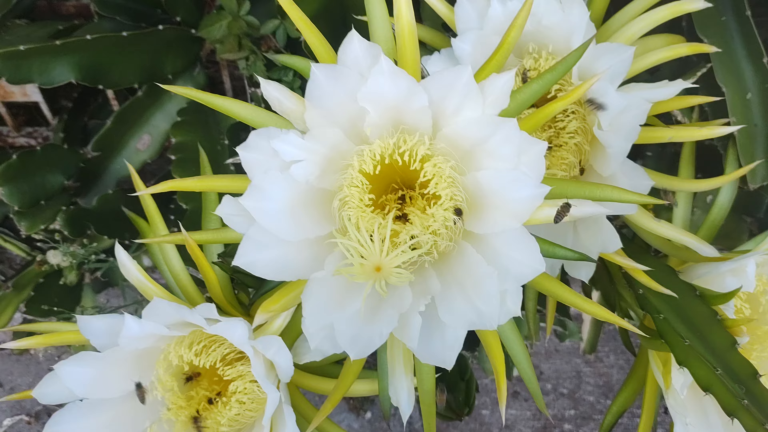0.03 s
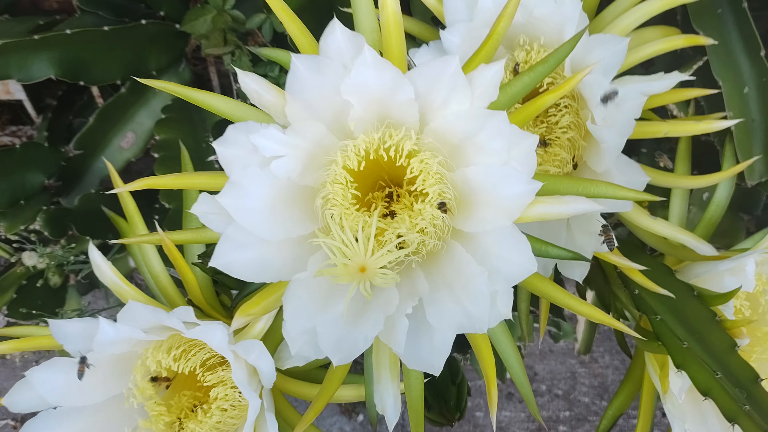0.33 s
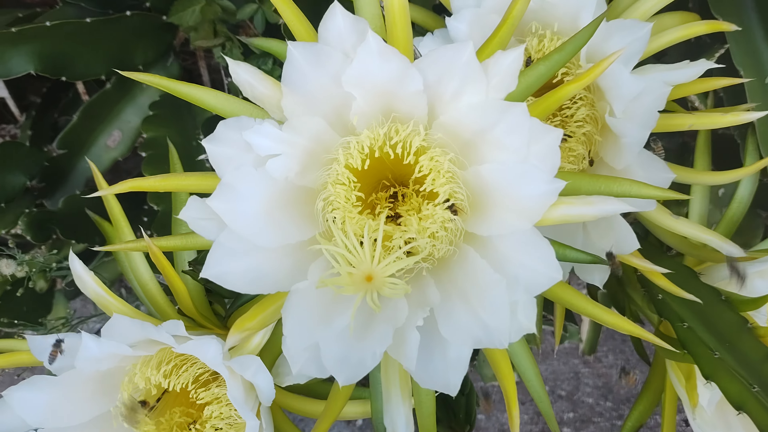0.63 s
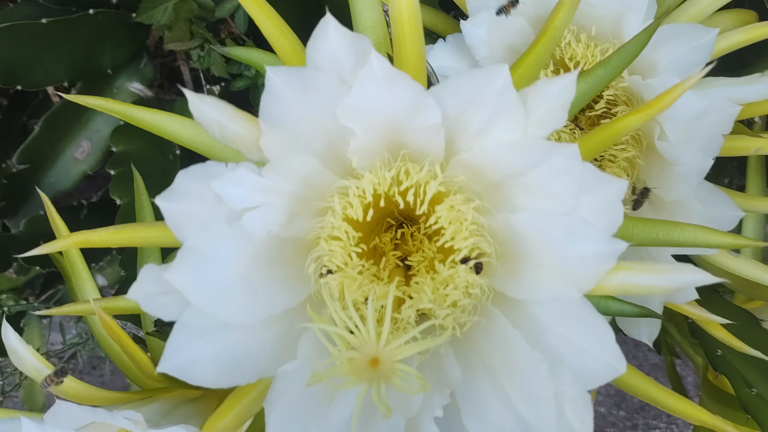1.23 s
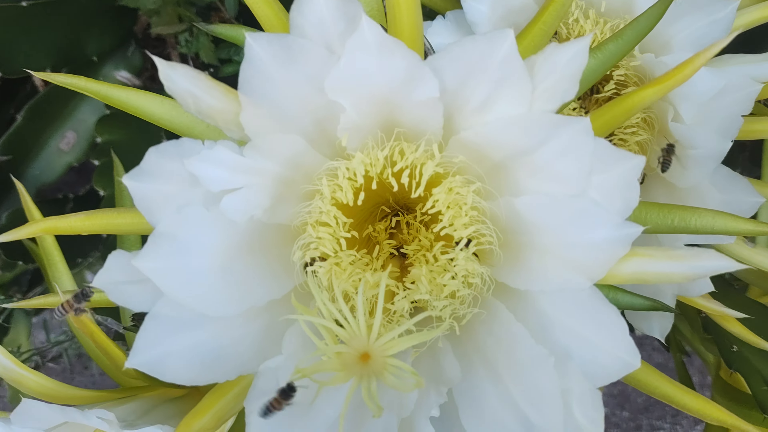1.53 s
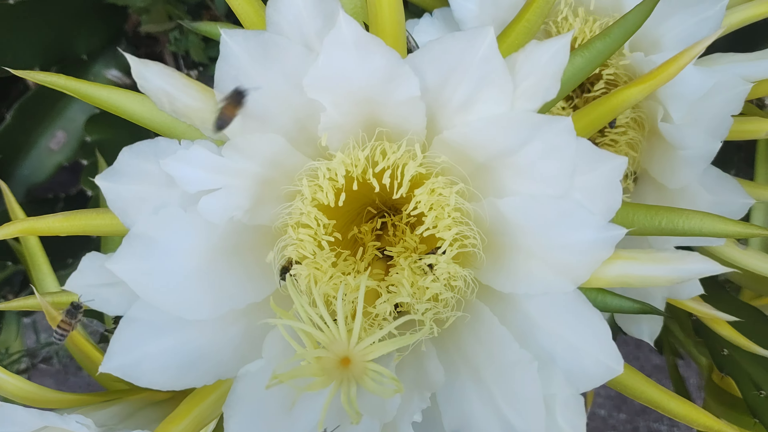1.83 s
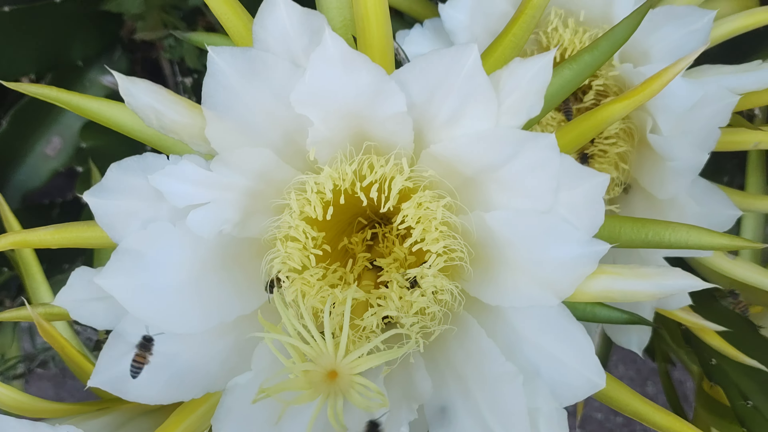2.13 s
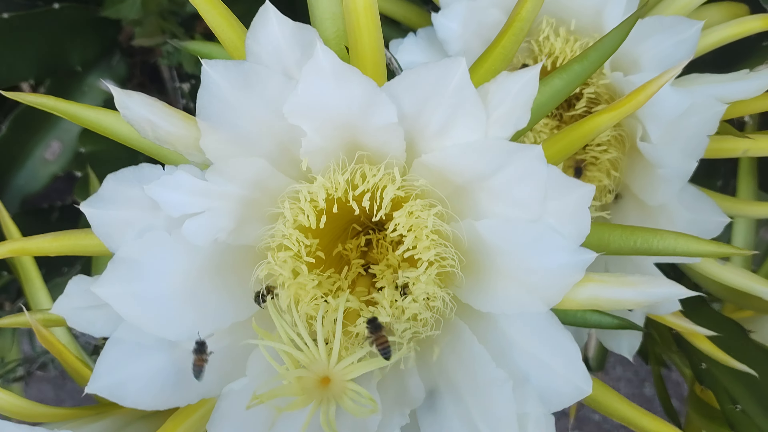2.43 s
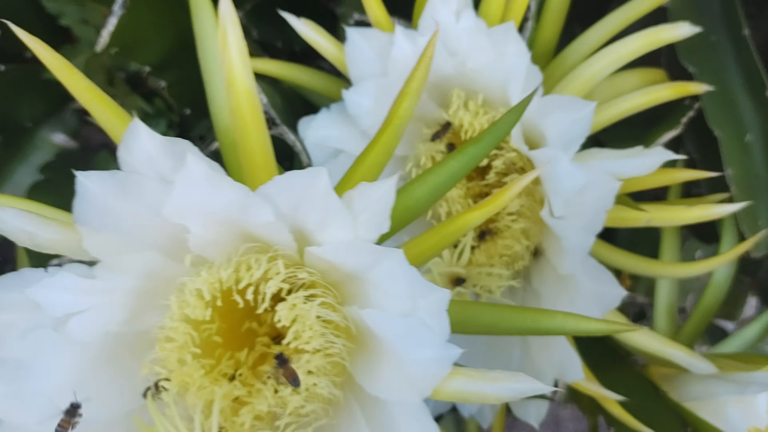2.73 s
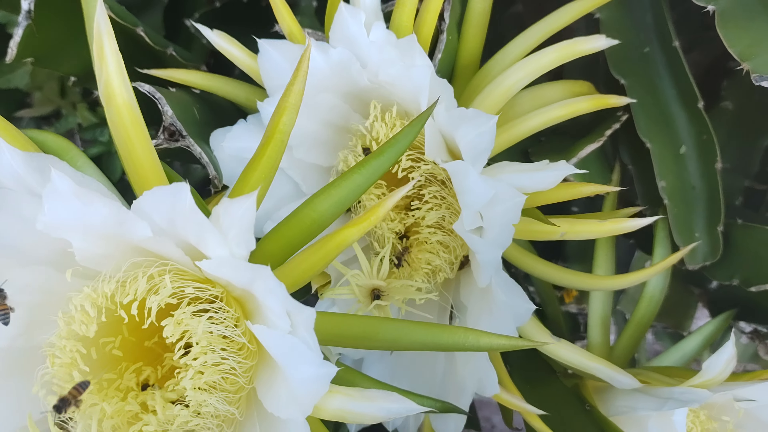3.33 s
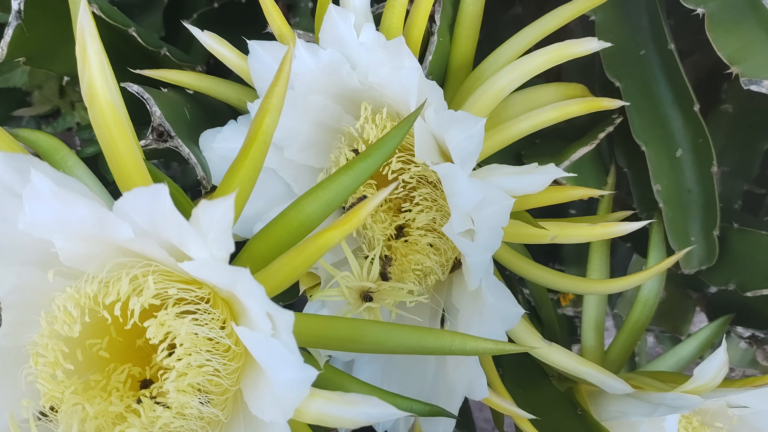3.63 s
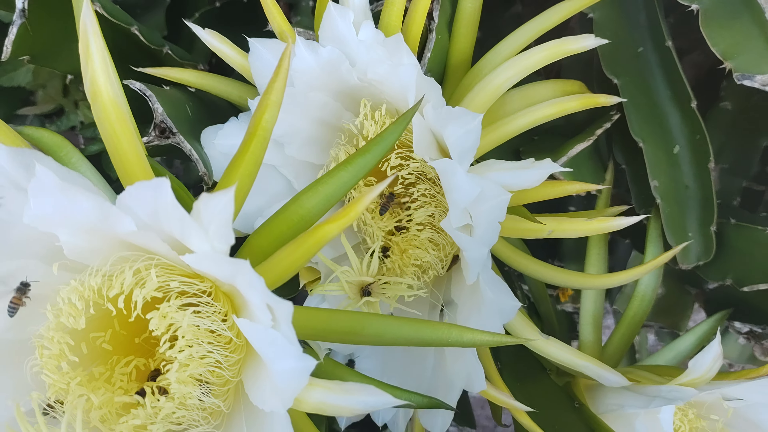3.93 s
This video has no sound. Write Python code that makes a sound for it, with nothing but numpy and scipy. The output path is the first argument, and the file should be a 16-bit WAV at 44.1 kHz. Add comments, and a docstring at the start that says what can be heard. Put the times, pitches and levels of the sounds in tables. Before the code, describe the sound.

Faint buzzing of bees in a garden, with far-off road noise behind them.

```python
"""Honeybees work large flowers in a garden, their beating wings making a faint hum.
A deeper-voiced insect passes, a far bird whistles once, and a few tiny chips and ticks sound.
Behind them is the rumble and hiss of far-off traffic. It sinks for a while, then a more hollow
road noise swells, perhaps a vehicle drawing nearer.
The microphone opens a moment late, after a small click."""
import sys
import numpy as np
from scipy import signal
from scipy.fft import rfft, irfft
from scipy.io import wavfile

SR = 44100
rng = np.random.default_rng(int(sys.argv[2]) if len(sys.argv) > 2 else 0)


def transcribe(signal):
    """Save signal, clipped to [-1, 1], as a 16-bit WAV file at the path in sys.argv[1]."""
    frames = np.atleast_2d(signal).T
    limited = np.clip(frames, -1, 1)
    pcm = np.round(limited * 32767).astype(np.int16)
    wavfile.write(sys.argv[1], SR, pcm)


N = 176400
T = np.arange(N) / SR


def from_db(db):
    """Turn decibels into a number to multiply a sound by."""
    return 10 ** (np.asarray(db) / 20)


def rms_one(x):
    """Scale a signal so that its average strength (rms) is 1."""
    return x / np.sqrt(np.mean(x ** 2) + 1e-20)


def level(rows):
    """A loudness curve that joins rows of t/s, level/dB."""
    return from_db(np.interp(T, *np.transpose(rows)))


def drift(rate):
    """A smooth random wobble of size about 1; rate is roughly its changes per second."""
    step, warm_up = 40, 2000   # one value every 40 samples; the first 2000 values are dropped
    memory = np.exp(-2 * np.pi * step * rate / SR)
    chance = rng.standard_normal(N // step + warm_up + 2)
    slow = signal.lfilter([1], [1, -2 * memory, memory * memory], chance)[warm_up:]
    return np.interp(np.arange(N) / step, np.arange(len(slow)), rms_one(slow))


def noise(colour, peaks=()):
    """Noise of strength 1; its colour says how strong the low and high pitches are, relatively."""
    hz = np.maximum(np.arange(N // 2 + 1) * SR / N, 1)
    points_hz, points_db = np.transpose(colour)
    db = np.interp(np.log(hz), np.log(points_hz), points_db)
    for centre, width, lift in peaks:
        db = db + lift / (1 + (2 * (hz - centre) / width) ** 2)
    return rms_one(irfft(rfft(rng.standard_normal(N)) * from_db(db), N))


def swell(middle, length):
    """A bell-shaped rise and fall, loudest at the middle time."""
    return np.exp(-2 * ((T - middle) / length) ** 2)


def slide(middle, length, hz, glide):
    """A pitch that slides through hz at the middle time, by glide Hz each second."""
    return hz + glide * np.clip(T - middle, -length, length)


# How loud the low rumble, the broad wash and the hollow road noise are: t/s, level/dB
RUMBLE_LEVEL = [(.38, -48.5), (.52, -43.5), (.85, -43.5), (1.3, -45.5), (1.95, -44), (2.4, -50),
                (2.8, -55.5), (3.35, -56), (3.7, -55), (4, -47)]
WASH_LEVEL = [(.38, -51.5), (.53, -47.5), (.9, -46.5), (1.65, -45.5), (2.25, -44), (2.6, -48.5), (3.0, -55),
              (3.35, -54), (4, -62)]
ROAD_LEVEL = [(.38, -70), (2.2, -59.5), (2.7, -54.5), (3.15, -52.5), (3.32, -54), (3.5, -47), (3.8, -43.5),
              (4, -41.5)]
# The colour of each: f/Hz, level/dB
RUMBLE_COLOUR = [(20, -31.5), (36, -26), (60, -5.5), (82, 1.5), (120, -3), (165, -6.5), (240, -9),
                 (350, -11), (480, -14), (680, -19.5), (1200, -51.5)]
WASH_COLOUR = [(200, -4.5), (650, -8), (790, -1.5), (890, -6.5), (1000, -3), (1230, -3.5), (1620, -0.5),
               (1950, -5), (2300, -8.5), (2650, -14), (3050, -30), (3450, -39.5), (4200, -51)]
ROAD_COLOUR = [(30, -21.5), (70, -9.5), (130, 4), (195, -3), (290, 0.5), (380, -1), (470, -6), (700, -3.5),
               (900, 2), (1300, -3.5), (1700, 1), (2100, 0), (2400, -5), (2700, -16), (3150, -25.5),
               (4000, -45.5)]
# Ringing pitches that make the road noise hollow: f/Hz, width/Hz, lift/dB
ROAD_PEAKS = [(288, 61, 7.4), (1001, 86, 7), (1905, 200, 5.1)]

def traffic():
    """Far traffic rumbles and hisses, then hollow road noise swells; each is a little unsteady."""
    rumble = level(RUMBLE_LEVEL) * noise(RUMBLE_COLOUR) * from_db(drift(12))
    wash = level(WASH_LEVEL) * noise(WASH_COLOUR) * from_db(.45 * drift(4.5))
    road = level(ROAD_LEVEL) * noise(ROAD_COLOUR, ROAD_PEAKS) * from_db(.5 * drift(16))
    return rumble + wash + road


# How loud the open air is: t/s, level/dB
AIR_LEVEL = [(.38, -67.5), (.6, -68.5), (1.7, -68.5), (2.3, -73), (2.9, -74.5), (3.4, -72), (4, -73.5)]
# Its colour: f/Hz, level/dB
AIR_COLOUR = [(2500, -1), (3500, 3.5), (3900, -0.5), (4950, -0.5), (5950, -2.5), (6700, -1.5), (7600, -13),
              (9000, -11.5)]
# Narrow hisses, the high ones perhaps far insects: middle t/s, length/s, f/Hz, width/Hz, level/dB
HISS_BANDS = [(1.007, 2.8, 2856, 371, -67.5), (1.148, 1.58, 4940, 763, -75), (3.7, 1.5, 6910, 163, -89.5)]

def air():
    """The thin hiss of open air, with narrow hisses that slowly come and go."""
    hiss = level(AIR_LEVEL) * noise(AIR_COLOUR)
    for middle, length, hz, width, db in HISS_BANDS:
        band = signal.butter(2, [hz - width / 2, hz + width / 2], "band", fs=SR, output="sos")
        narrow_hiss = rms_one(signal.sosfilt(band, rng.standard_normal(N)))
        hiss = hiss + from_db(db + drift(9.1)) * swell(middle, length) * narrow_hiss
    return hiss


# Light ticks: t/s, body level/dB, snap level/dB
TICKS = [(2.781, -43, -63), (3.701, -40.5, -75)]
# The colours of a tick's dull body and bright snap: f/Hz, level/dB
BODY_COLOUR = [(100, 7), (500, 1), (1900, -3), (3200, -27), (8000, -43)]
SNAP_COLOUR = [(3000, -16), (4500, 3), (6000, -5), (8000, -12)]

def ticks(fade_s=.022):
    """Dry bursts, as of a leaf or stem being touched; each drops 60 dB in fade_s."""
    body, snap = noise(BODY_COLOUR), noise(SNAP_COLOUR)
    sound = np.zeros(N)
    for start, body_db, snap_db in TICKS:
        fade = (T >= start) * np.exp(-np.log(1000) * np.abs(T - start) / fade_s)
        sound += fade * (from_db(body_db) * body + from_db(snap_db) * snap)
    return sound


# Tiny high chips: middle t/s, length/s, f/Hz, glide/(Hz per s), level/dB
CHIPS = [(1.848, .022, 6400, -25000, -66), (2.117, .008, 6500, -25000, -74),
         (2.352, 0.013, 6700, -10000, -77), (2.427, .016, 6560, -10000, -69)]

def chips():
    """Very short falling notes, made rough by a fast shake in pitch."""
    shake = 1 + .028 * drift(300)
    sound = np.zeros(N)
    for middle, length, hz, glide, db in CHIPS:
        pitch_hz = slide(middle, length, hz, glide) * shake
        sound += from_db(db) * swell(middle, length) * np.sin(2 * np.pi * np.cumsum(pitch_hz) / SR)
    return sound


# The bird's whistle: t/s, f/Hz, level/dB
WHISTLE = [(.45, 3080, -99), (0.464, 3200, -57), (0.477, 3360, -56.5), (.518, 3340, -53.5),
           (0.529, 3240, -60), (.55, 3225, -57.5), (.585, 3205, -63.5), (.61, 3230, -91),
           (.625, 3190, -68.5), (.66, 3050, -75.5), (.69, 2970, -63.5), (.74, 2780, -79)]
# Its echoes from walls: delay/s, level/dB (compared with the whistle)
WALL_ECHOES = [(.105, -25), (.165, -6), (.28, -17)]

def bird(trees_db=-11, trees_fade_s=1.7):
    """A pure far whistle lifts, then steps down; walls echo it and trees scatter it into a soft tail."""
    times, hz, db = np.transpose(WHISTLE)
    loudness = from_db(np.interp(T, times, db)) * (T > times[0]) * (T < times[-1])
    call = loudness * np.sin(2 * np.pi * np.cumsum(np.interp(T, times, hz)) / SR)
    scatter = rng.standard_normal(N) * np.exp(-np.log(1000) * T / trees_fade_s)
    tail = from_db(trees_db) * signal.fftconvolve(call, scatter / np.linalg.norm(scatter))[:N]
    echoes = sum(from_db(echo_db) * np.interp(T - delay, T, call) for delay, echo_db in WALL_ECHOES)
    return call + tail + echoes


def buzz(wing_hz, harmonics, jitter=.00684, flutter_db=2):
    """Wings make tones at 1, 2, 3... times their beat (harmonics); each flutters as the insect turns."""
    uneven_hz = wing_hz * (1 + jitter * drift(54.7))
    phase = 2 * np.pi * (np.cumsum(uneven_hz) / SR + rng.random())
    return rms_one(sum(from_db(db + flutter_db * drift(16)) * np.sin(k * phase)
                       for k, db in enumerate(harmonics, start=1)))


def fly_by(passes, harmonics, wander=.007):
    """An insect's buzz swells, glides in pitch and fades each time it goes past."""
    sound = np.zeros(N)
    for middle, length, hz, glide, db in passes:
        wing_hz = slide(middle, length, hz, glide) * (1 + wander * drift(8.26))
        sound += from_db(db) * swell(middle, length) * buzz(wing_hz, harmonics)
    return sound


# The deeper insect's passes: middle t/s, length/s, wingbeat f/Hz, glide/(Hz per s), level/dB
DEEP_PASSES = [(.57, 0.22, 212.5, 3.5, -51.5), (1.97, .18, 213, -9.5, -51), (2.52, .22, 204.4, -9, -57)]
# The balance of its harmonics, first to fifth: level/dB
DEEP_HARMONICS = [-8, 4.5, -12.5, -15.5, -18.5]

def deep_insect():
    """An insect with a slower wingbeat, and so a deeper voice, flies past."""
    return fly_by(DEEP_PASSES, DEEP_HARMONICS)


# How loud the bees hum together: t/s, level/dB
SWARM_LEVEL = [(.38, -61), (.6, -57), (1.2, -47.5), (1.9, -50), (2.3, -49), (2.7, -54.5), (3.3, -57),
               (4, -58)]
# Single bees flying close: middle t/s, length/s, wingbeat f/Hz, glide/(Hz per s), level/dB
BEE_PASSES = [(.61, .32, 280.6, -22.5, -49.5), (1.11, 0.15, 277, 35, -50), (1.27, 0.21, 266.7, 0.5, -54),
              (1.61, .14, 275.6, -10, -45.5), (1.79, 0.19, 274.6, -20.5, -49),
              (1.88, 0.28, 259, -20, -52.5), (2.22, 0.28, 274.4, -15, -51.5)]
# The balance of a bee's harmonics, first to eighth: level/dB
BEE_HARMONICS = [-7.5, -2, -10, -17.5, -14, -13.5, -15, -27]

def honeybees(count=6, wingbeat_hz=266.95, spread_hz=11, wander=.02, waver_db=1.9):
    """Bees hum among the flowers, each straying around its own wingbeat; now and then one flies close."""
    swarm = np.zeros(N)
    for own_hz in wingbeat_hz + spread_hz * np.linspace(-1, 1, count):
        loudness = from_db(waver_db * drift(2))
        wing_hz = own_hz * (1 + wander * drift(3))
        swarm += loudness * buzz(wing_hz, BEE_HARMONICS)
    return level(SWARM_LEVEL) * rms_one(swarm) + fly_by(BEE_PASSES, BEE_HARMONICS)


def scene():
    """The whole garden in one channel: traffic and air behind the insects, bird, chips and ticks."""
    insects = honeybees() + deep_insect()
    return (traffic() + air() + insects + bird() + chips() + ticks())[None]


def record(dry, click_s=.0822, click_db=-54, click_hz=450, opens_s=.3752, fade_in_s=.0051):
    """The microphone switches on with a dull click, then opens; it cuts the deep bass and the top."""
    click = from_db(click_db) * (T >= click_s) * np.exp(-2 * np.pi * click_hz * np.abs(T - click_s))
    live = dry * np.clip((T - opens_s) / fade_in_s, 0, 1) + click
    bass_cut = signal.butter(4, 42, "high", fs=SR, output="sos")   # below 42 Hz
    treble_cut = signal.cheby2(18, 60, 8600, fs=SR, output="sos")   # 60 dB down from 8600 Hz up
    return signal.sosfilt(treble_cut, signal.sosfilt(bass_cut, live))


dry = scene()
out = record(dry)
transcribe(out)
```